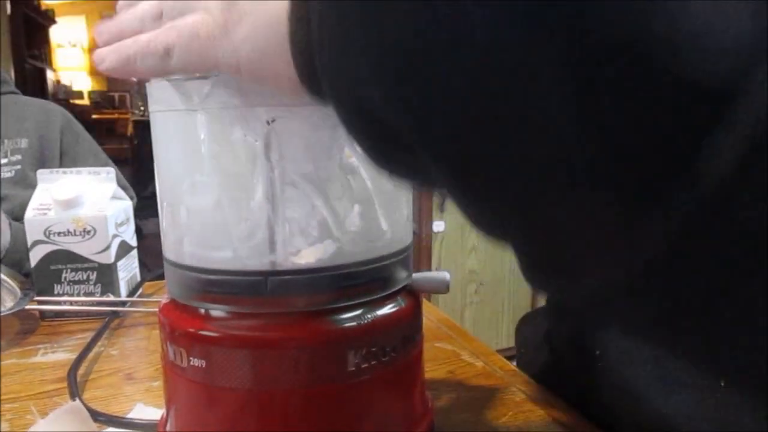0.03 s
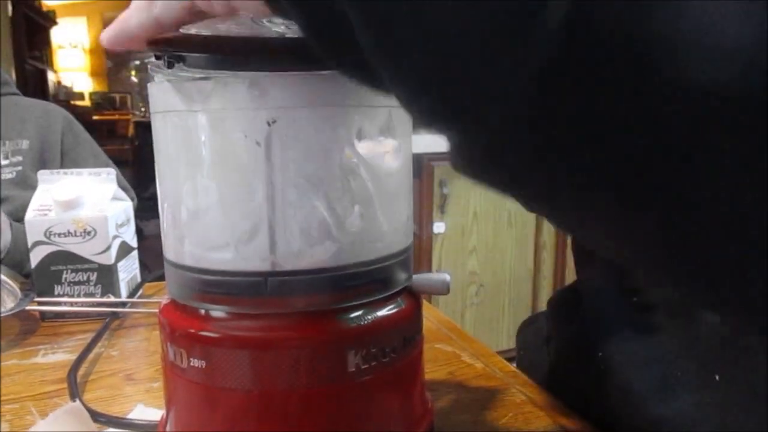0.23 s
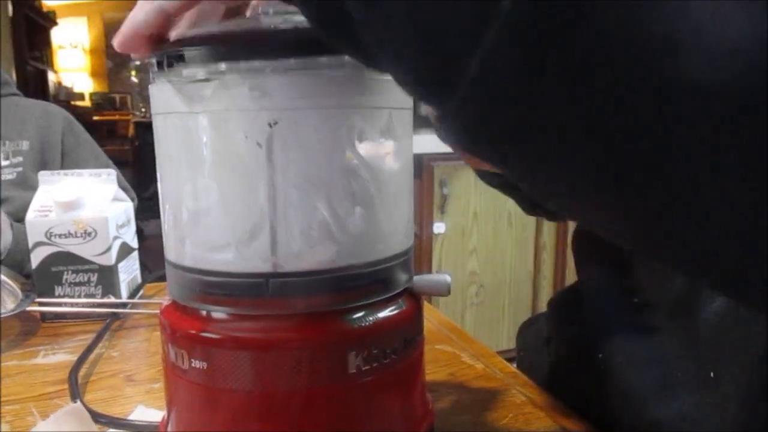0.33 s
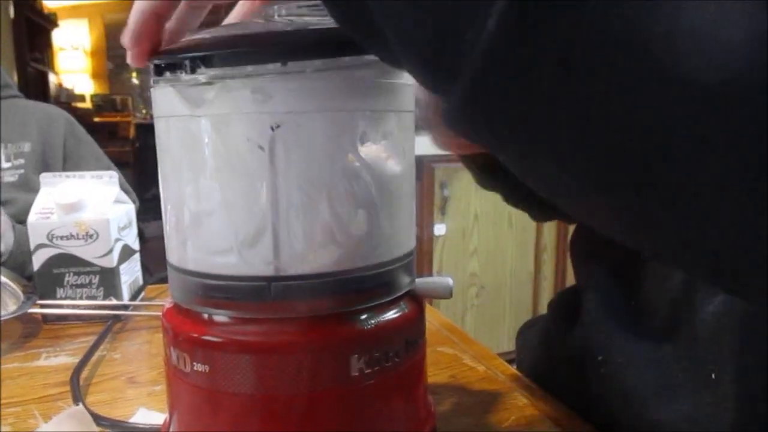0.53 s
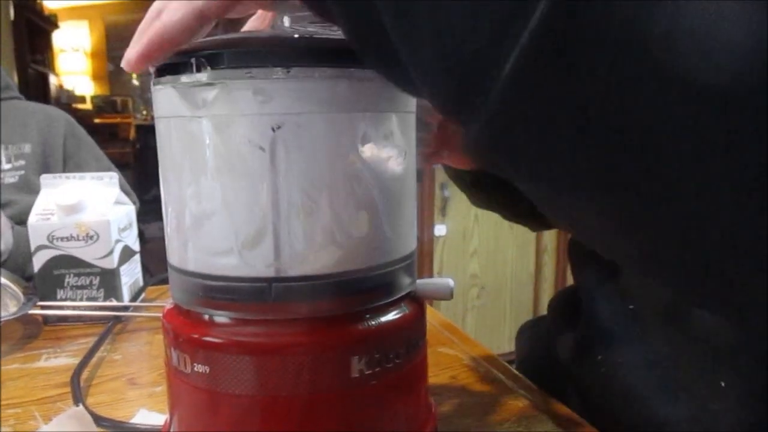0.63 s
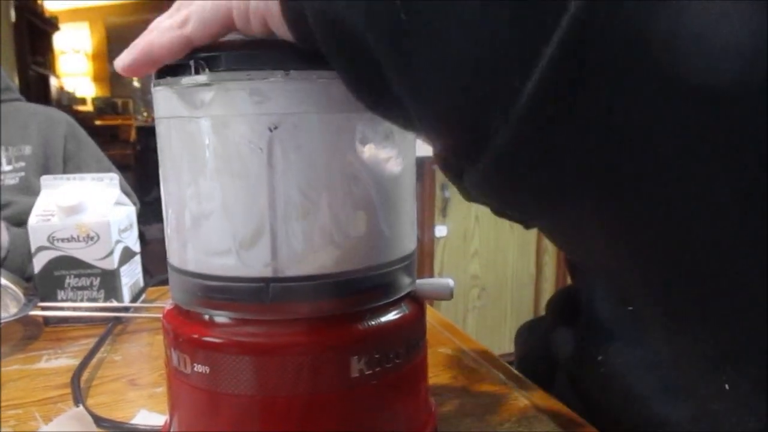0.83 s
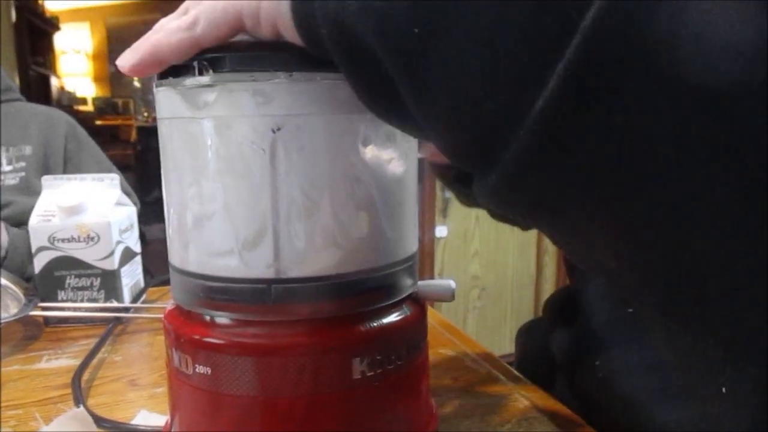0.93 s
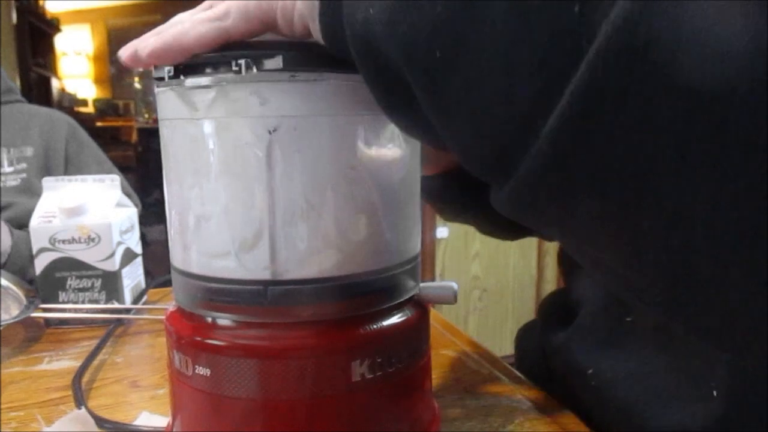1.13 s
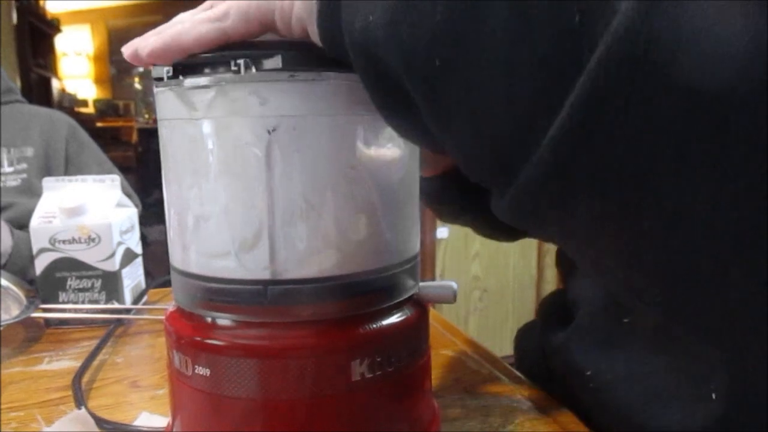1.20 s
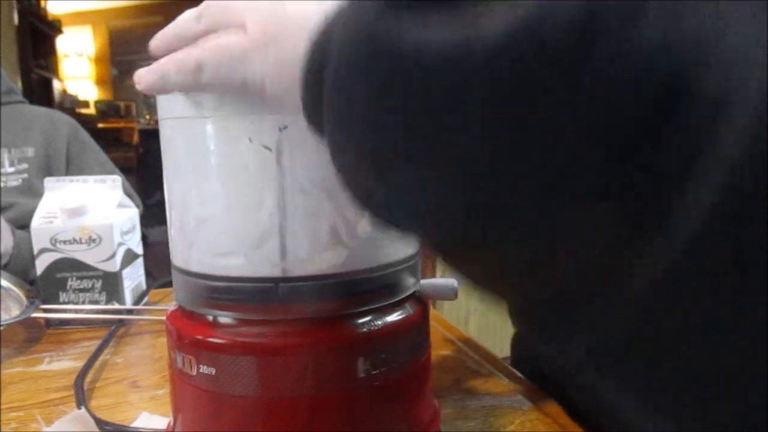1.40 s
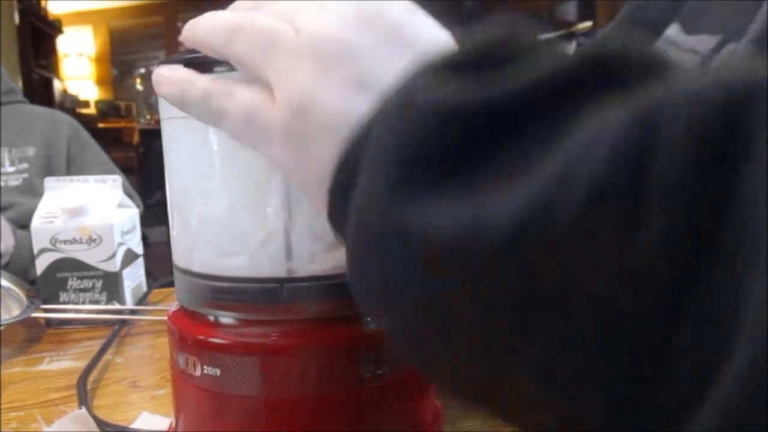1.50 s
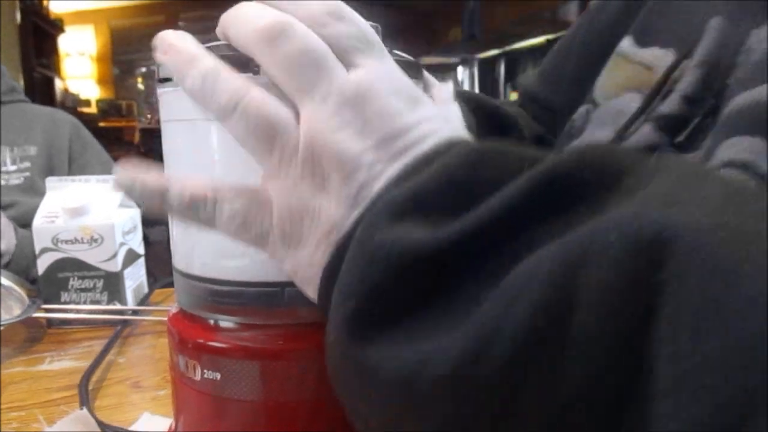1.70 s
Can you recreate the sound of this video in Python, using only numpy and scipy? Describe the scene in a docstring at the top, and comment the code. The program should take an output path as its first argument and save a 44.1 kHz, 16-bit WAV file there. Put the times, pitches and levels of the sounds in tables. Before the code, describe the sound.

Food processor's plastic lid clacks onto its bowl, scraping and twisting until the latch snaps.

```python
"""A food processor's plastic lid is set on its bowl, pushed home with a loud clack and twisted
until the latch snaps. Each contact thumps the base, knocks the hollow bowl and cracks in lid,
latch and edge; in between, the rim scrapes and the locking tab rubs. Heard close by in a small
kitchen with a low rumble; the hardest clack overloads the microphone and ducks its gain."""
import sys
import numpy as np
from scipy import signal
from scipy.fft import rfft, irfft
from scipy.io import wavfile
from scipy.ndimage import uniform_filter1d

SR = 44100
rng = np.random.default_rng(int(sys.argv[2]) if len(sys.argv) > 2 else 0)


def to_wav(sig):
    """Store sig (one row per channel, or 1-D mono) as 16-bit WAV at the path in sys.argv[1].

    Samples outside -1..1 are clipped; the rate is SR.
    """
    pcm = np.clip(np.atleast_2d(sig), -1, 1) * 32767
    pcm = np.round(pcm).astype(np.int16)
    wavfile.write(sys.argv[1], SR, pcm.T)  # frames by channels


N = 77175
RING_TIME_S = np.arange(SR // 5) / SR


def from_db(db):
    """Decibels to gain."""
    return 10 ** (np.asarray(db) / 20)


def unit_energy(x):
    """Scale to an energy of one."""
    return x / np.sqrt(np.sum(x ** 2) + 1e-20)


def gain_curve(points):
    """Gain over time from (s, dB) points."""
    return from_db(np.interp(np.arange(N) / SR, *np.transpose(points)))


def decay(t, t60_s):
    """Exponential fall, 60 dB in t60_s."""
    return np.exp(-np.log(1000) * t / max(t60_s, 1e-3))


def bandpass(x, low_hz, high_hz):
    """Causal band-pass."""
    edges_hz = [low_hz, min(high_hz, SR / 2 - 1000)]
    return signal.sosfilt(signal.butter(2, edges_hz, "band", fs=SR, output="sos"), x)


def coloured(x, spectrum):
    """Filter by (Hz, dB) points; rms one."""
    hz, db = np.transpose(spectrum)
    bins_hz = np.maximum(np.arange(N // 2 + 1) * SR / N, 1)
    gains = from_db(np.interp(np.log(bins_hz), np.log(hz), db))
    return unit_energy(irfft(rfft(x) * gains, N)) * np.sqrt(N)


def background():
    """Steady room noise over a deep rumble, strongest in the first half second."""
    # Room noise. Each row: frequency in Hz, relative density in dB.
    noise_spectrum = [(20, -13), (44, 2), (65, -8), (130, -4), (250, -13.5), (500, -16.5), (1000, -19),
                      (2000, -21.5), (4000, -33), (8000, -39), (15000, -46)]
    # Each row: time in seconds, level in dB.
    rumble_levels = [(0, -65), (.07, -38.5), (.3, -45), (.47, -39), (.53, -60.5), (1.75, -59)]
    noise_db = -44
    rumble = bandpass(rng.standard_normal(N + SR), low_hz=32, high_hz=49.4)[SR:]
    rumble = unit_energy(rumble) * np.sqrt(N) * gain_curve(rumble_levels)
    return coloured(rng.standard_normal(N), noise_spectrum) * from_db(noise_db) + rumble


def friction(spectrum, slips_per_s):
    """Tiny uneven slips of plastic on plastic; rms one."""
    spread_db = 0.5
    sizes = from_db(spread_db * np.minimum(rng.exponential(1, N), 5))
    signs = rng.choice([-1, 1], N)
    slipping = rng.random(N) < slips_per_s / SR
    return coloured(sizes * signs * slipping, spectrum)


def rim_scrape():
    """The lid's rim slides on the bowl."""
    # Each row: frequency in Hz, relative density in dB.
    scrape_spectrum = [(150, -5), (300, 2.5), (500, 1.5), (800, -6.5), (1300, -15), (2000, -10.5),
                       (3000, -22.5), (7000, -26.5), (11000, -34.5), (16000, -39)]
    # Each row: time in seconds, level in dB.
    slide_levels = [(0, -41), (.13, -43), (.26, -36.5), (.33, -43.5), (0.447, -36), (0.491, -28),
                    (.53, -59), (.62, -64), (.67, -42.5), (.74, -41), (.8, -50.5), (1.08, -52),
                    (1.17, -47.5), (1.27, -45), (1.36, -51), (1.549, -64), (1.75, -57)]
    return friction(scrape_spectrum, slips_per_s=3100) * gain_curve(slide_levels)


def struck(modes, dense_modes, spot_hz=None):
    """One blow on a part: main modes, a noise burst for dense weak ones, the struck spot's ring."""
    spread_db, rise_s, energy_s = 3, 0.00018, 0.0078
    spot_db, spot_t60_cycles = 1, 30
    t = RING_TIME_S
    offsets_db = spread_db * rng.standard_normal(len(modes))
    signs = rng.choice([-1, 1], len(modes)) if len(modes) > 1 else [1]
    tones = sum(sign * from_db(db + offset_db) * np.sin(2 * np.pi * hz * t) * decay(t, t60_s)
                for (hz, db, t60_s), offset_db, sign in zip(modes, offsets_db, signs))
    low_hz, high_hz, burst_db, burst_t60_s = dense_modes
    burst = bandpass(rng.standard_normal(len(t)) * decay(t, burst_t60_s), low_hz, high_hz)
    blow = unit_energy(tones) + from_db(burst_db) * unit_energy(burst)
    if spot_hz and low_hz < spot_hz < high_hz:
        spot = np.cos(2 * np.pi * spot_hz * t) * decay(t, spot_t60_cycles / spot_hz)
        blow += from_db(spot_db) * unit_energy(spot)
    onset = 1 - np.exp(-t / rise_s)
    return unit_energy(blow * onset) * np.sqrt(energy_s * SR)


def lid_contacts():
    """Each contact sounds five parts; the bowl's pitch depends on how the lid covers it."""
    # Each row: start in seconds, base thump in dB, bowl knock in dB, bowl pitch in Hz,
    # lid clack in dB, latch snap in dB, edge tick in dB, ring of the struck spot in Hz.
    contacts = [ (.0556, -34.5, -28, 590, -48, -41.5, -67, 3070),
                (.0650, -48.5, -42, 493, -55, -75, -72, 1330),
                (0.1506, -49, -38.5, 535, -37, -30, -45.5, 3240),
                (.1580, -46, -30, 548, -35.5, -53, -63.5, 1920),
                (.2122, -26, -22.5, 502, -44, -41.5, -68, 1910),
                (.2520, -44, -31.5, 550, -40.5, -45, -63, 1970),
                (0.3493, -27.5, -18, 515, -23.5, -36, -56, 1950),
                (.3550, -61, -26, 542, -27, -27, -38, 1870), (0.4584, -47, -29, 515, -42, -33, -43, 2930),
                (0.4612, -42, -19, 474, -53, -46, -59, 1950),
                (0.474, -16.5, -12, 464, -12.5, -8, -24, 3080),
                (0.4821, -22, -8, 340, -13.5, -23.5, -36, 1840),
                (0.6376, -68, -30.5, 394, -46, -64, -74, 1510), (.6520, -57, -26, 435, -39, -46, -60, 1960),
                (0.678, -51, -24.5, 430, -52, -52, -66, 1950),
                (.6872, -39, -23.5, 500, -29.5, -31.5, -61, 1670),
                (0.69, -36.5, -29, 480, -32.5, -36, -53, 2760),
                (0.747, -24, -33.5, 396, -29.5, -42, -51, 1890),
                (0.7569, -15.5, -18, 576, -16.5, -27.5, -42, 1705),
                (0.9338, -26, -25.5, 702, -37, -36.5, -45, 1330),
                (0.974, -16.5, -23.5, 226, -25, -37.5, -64, 1030),
                (1.1033, -60, -52, 388, -47, -31.5, -34.5, 3970),
                (1.1368, -60, -47, 440, -46, -38.5, -43.5, 5340),
                (1.1802, -39, -44, 433, -38.5, -41, -48.5, 1430),
                (1.1992, -38, -38.5, 465, -34.5, -45, -50, 1440),
                (1.2287, -34, -26, 653, -33, -43, -44.5, 1600),
                (1.2324, -21.5, -28, 332, -30, -31.5, -42, 2740),
                (1.2510, -44, -28, 683, -39, -49, -56, 920), (1.2593, -27, -38, 313, -58, -53, -50, 900),
                (1.268, -31.5, -38, 338, -42, -58, -54, 1500),
                (1.2997, -30, -30, 720, -21.5, -16.5, -23.5, 3870),
                (1.3017, -27, -24, 268, -19, -21, -25, 1090),
                (1.4595, -34.5, -40, 537, -29, -23, -20.5, 4570),
                (1.4713, -41.5, -29, 379, -35, -34.5, -47, 2120),
                (1.7240, -43, -41.5, 533, -45, -55, -73, 1540), ]
    # Each row: frequency in Hz, relative level in dB, t60 in seconds.
    base_modes = [(127, -5, 0.047), (192, -4, 0.042), (259, 3.5, 0.035)]
    lid_modes = [(1020, -5.5, 0.012), (1134, -6.5, 0.016), (1353, -13.5, 0.041), (1589, -1.5, 0.024),
                 (1720, -1.5, 0.0095), (1988, -1, 0.028), (2195, -2, 0.017)]
    latch_modes = [(2738, 1.5, 0.023), (2969, 7.5, .018), (3520, 4.5, 0.015), (3940, 3.5, 0.013),
                   (4350, 4.5, 0.0086), (5420, -8.5, 0.01)]
    edge_modes = [(6230, -2, 0.011), (7030, 9, 0.0023), (8110, 5.5, 0.011), (9800, 3, 0.0087),
                  (10540, 6.5, 0.011), (12200, -13, .006), (14200, -7, .005)]
    # Dense modes: low and high edge in Hz, level re main modes in dB, t60 in seconds.
    base_dense = (139, 274.5, -13.5, 0.25)
    bowl_dense = (254, 875, -9, 0.2)
    lid_dense = (786.5, 2397, -3.5, 0.12)
    latch_dense = (2296, 5996, -5, 0.04)
    edge_dense = (5050, 10450, 5.3, 0.0094)
    bowl_t60_s = 0.031
    blows = np.zeros(N + SR)
    for start_s, base_db, bowl_db, bowl_hz, lid_db, latch_db, edge_db, spot_hz in contacts:
        start = int(start_s * SR)
        blows[start:start + len(RING_TIME_S)] += (
            from_db(base_db) * struck(base_modes, base_dense)
            + from_db(bowl_db) * struck([(bowl_hz, 0, bowl_t60_s)], bowl_dense)
            + from_db(lid_db) * struck(lid_modes, lid_dense, spot_hz)
            + from_db(latch_db) * struck(latch_modes, latch_dense, spot_hz)
            + from_db(edge_db) * struck(edge_modes, edge_dense))
    return blows[:N]


def tab_rub():
    """The locking tab hisses along its track."""
    # Each row: frequency in Hz, relative density in dB.
    hiss_spectrum = [(800, -35), (2500, 5.5), (5000, -0.5), (9000, -5.5), (13000, -13.5), (16000, -18)]
    # Each row: time in seconds, level in dB.
    rub_levels = [(.66, -88), (0.742, -49), (.78, -75), (1.09, -69), (1.15, -50.5), (1.21, -59),
                  (1.24, -45), (1.29, -41.5), (1.33, -51), (1.44, -58), (1.5, -47), (1.56, -48.5),
                  (1.62, -59.5)]
    return friction(hiss_spectrum, slips_per_s=4500) * gain_curve(rub_levels)


def machine_body(x):
    """The whole machine rings on faintly; it is too small to radiate deep bass."""
    # Each row: frequency in Hz, peak gain in dB, t60 in seconds.
    resonances = [(217.4, -7, 0.24), (338.7, -1.5, 0.22), (499, -7, 0.064), (930, -31.5, .33),
                  (1490, -18, 0.47), (1910, -5.5, 0.24), (2070, -16, .17), (2850, -16, .12),
                  (3070, -17, .18), (5570, -2, .2)]
    low_cut_hz = 128
    ringing = np.zeros(N)
    for hz, db, t60_s in resonances:
        radius = decay(1 / SR, t60_s)
        feedforward = (1 - radius ** 2) / 2 * np.array([1, 0, -1])
        feedback = [1, -2 * radius * np.cos(2 * np.pi * hz / SR), radius ** 2]
        ringing += from_db(db) * signal.lfilter(feedforward, feedback, x)
    return signal.sosfilt(signal.butter(2, low_cut_hz, "high", fs=SR, output="sos"), x + ringing)


def kitchen_reverb(x):
    """Quick reflections from table and body, then a diffuse tail dying band by band."""
    # Each row: frequency in Hz, level before band-pass in dB, t60 in seconds.
    tail_profile = [(99, -17, 0.28), (350, -24, 0.43), (990, -18, 0.65), (2380, -18.5, .42),
                    (5000, -20.5, 0.43), (9000, -17, 0.13), (15000, -31, 0.15)]
    early_db, early_t60_s, delay_s = -17.5, 0.085, 0.0024
    hz, db, t60_s = np.transpose(tail_profile)
    t = np.arange(SR // 2) / SR
    onset = np.clip(t / delay_s - 1, 0, 1)
    early = rng.standard_normal(len(t)) * onset * decay(t, early_t60_s)
    response = from_db(early_db) * unit_energy(early)
    edges_hz = np.geomspace(70, 16000, 11)
    for low_hz, high_hz in zip(edges_hz, edges_hz[1:]):
        log_centre = np.log(low_hz * high_hz) / 2
        band_t60_s = np.interp(log_centre, np.log(hz), t60_s)
        band_db = np.interp(log_centre, np.log(hz), db)
        tail = unit_energy(rng.standard_normal(len(t)) * onset * decay(t, band_t60_s))
        response += from_db(band_db) * bandpass(tail, low_hz, high_hz)
    return signal.fftconvolve(x, response)[:N]


def gain_control(x):
    """Gain drops after a very loud moment and creeps back up."""
    threshold_db, max_duck_db = -12, 8.5
    window_s, attack_s, recovery_db_per_s = 0.011, 0.024, 12
    power = uniform_filter1d(x ** 2, int(window_s * SR))
    level_db = 10 * np.log10(np.maximum(power, 1e-12))
    wanted_db = np.clip(2 * (level_db - threshold_db), 0, max_duck_db)
    recovery_db = recovery_db_per_s * np.arange(N) / SR
    held_db = np.maximum.accumulate(wanted_db + recovery_db, axis=-1) - recovery_db
    pole = np.exp(-1 / (attack_s * SR))
    duck_db = signal.lfilter([1 - pole], [1, -pole], held_db)
    return x * from_db(-duck_db)


def scene():
    """The lid being closed in the kitchen; mono."""
    machine = machine_body(lid_contacts() + rim_scrape() + tab_rub())
    return (machine + kitchen_reverb(machine) + background())[None]


def record(dry):
    """Gain control acts too late for the loudest peaks, which clip; a steep low-pass follows."""
    cutoff_hz = 15100
    clipped = np.clip(gain_control(dry), -1, 1)
    return signal.sosfilt(signal.ellip(10, .2, 60, cutoff_hz, fs=SR, output="sos"), clipped)


dry = scene()
out = record(dry)
to_wav(out)
```